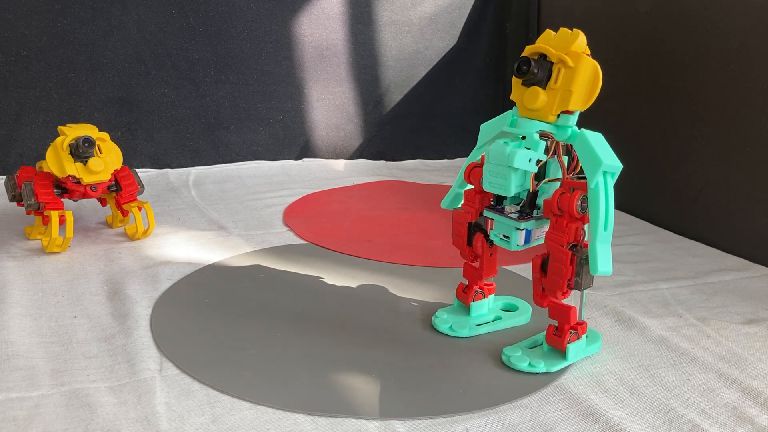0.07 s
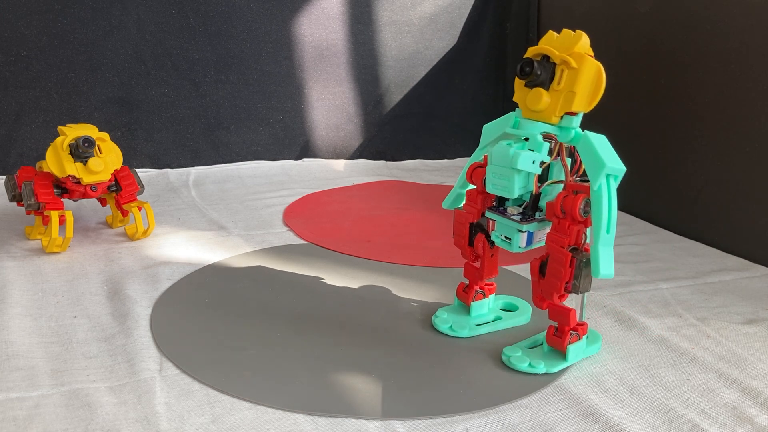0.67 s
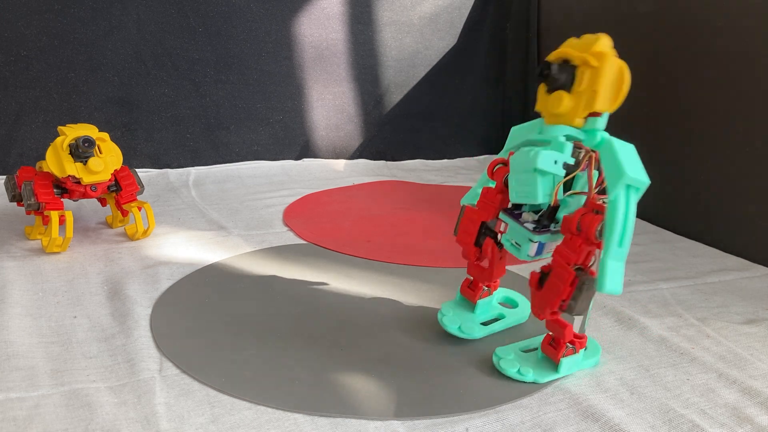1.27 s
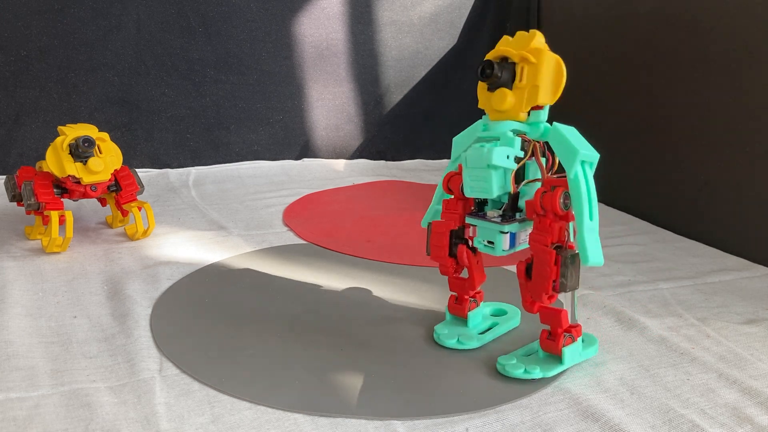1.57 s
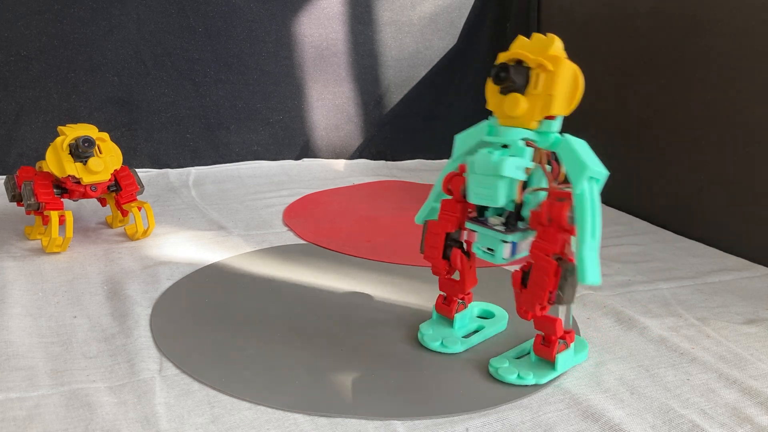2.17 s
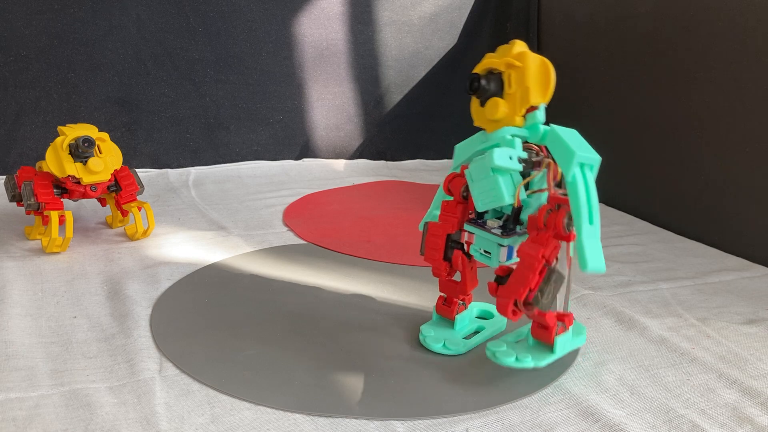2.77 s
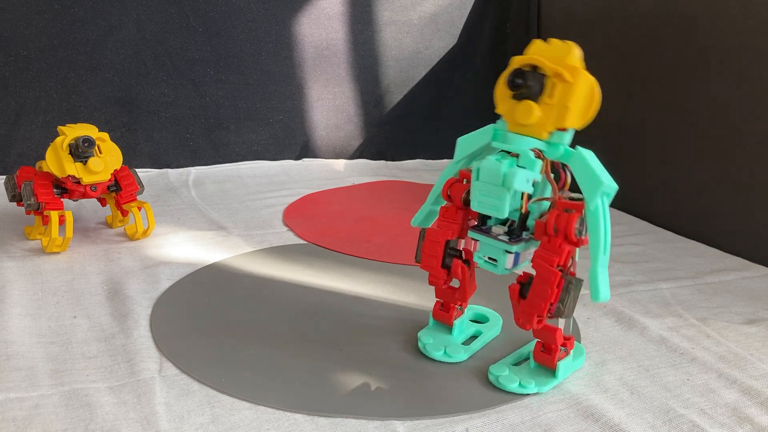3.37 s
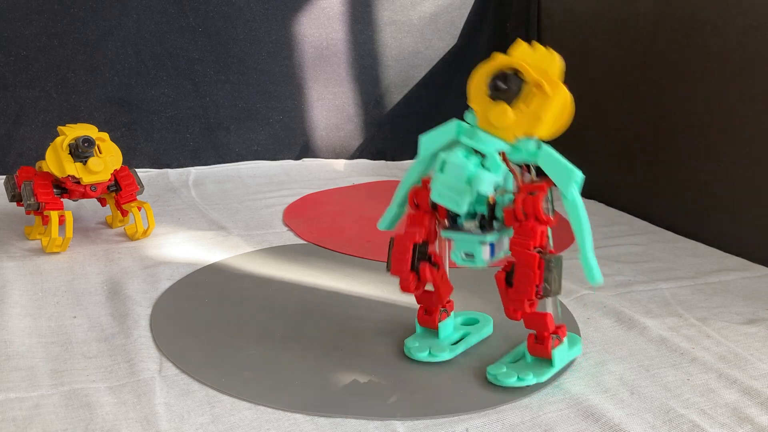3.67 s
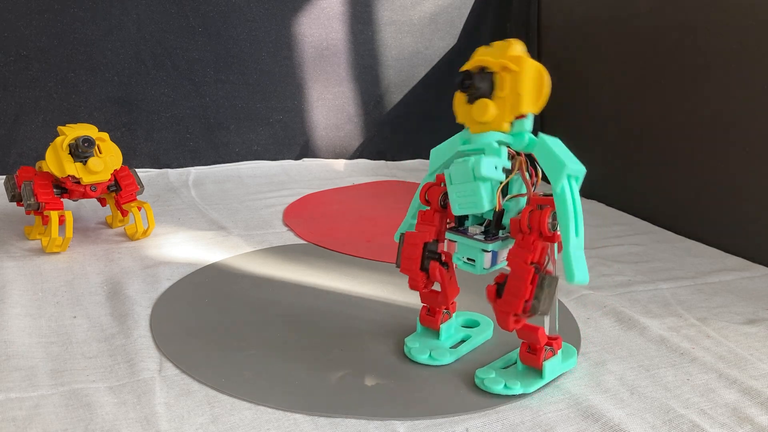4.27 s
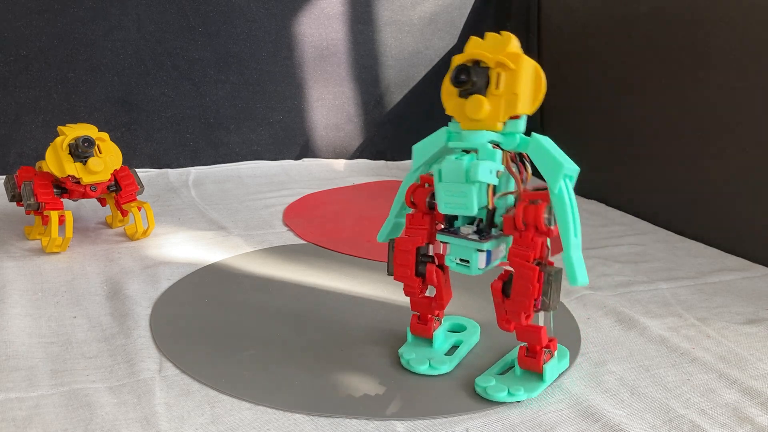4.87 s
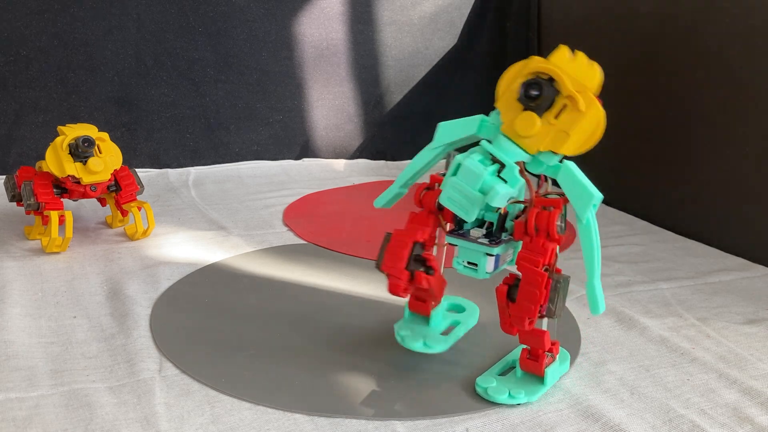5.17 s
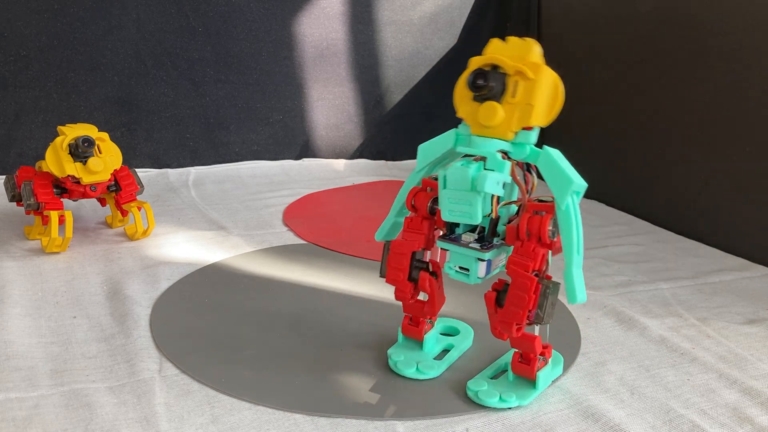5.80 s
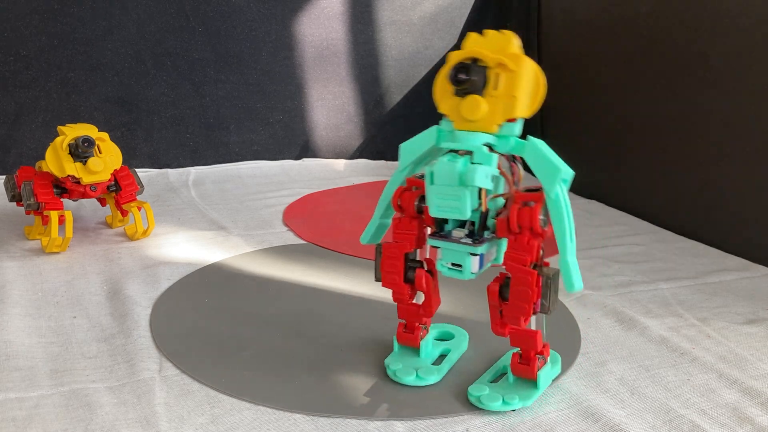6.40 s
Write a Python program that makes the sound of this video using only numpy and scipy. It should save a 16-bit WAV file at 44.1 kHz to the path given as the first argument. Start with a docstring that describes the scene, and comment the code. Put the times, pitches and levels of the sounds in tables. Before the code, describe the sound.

Rhythmic bursts of high servo rattle and gear snaps, with soft thumps and clacks as a little robot steps across a tabletop.

```python
"""A small plastic robot takes seven rattling, thumping steps on a cloth-covered table, heard close in stereo.
Tooth impacts in its servo gear trains rattle in bursts, snap on starts and jolts, squeal at the fastest
moves and buzz in the hip as the weight shifts. The frame groans as a leg lifts; each footfall clacks
the sole and rings the table top. A quiet room rumbles underneath, with a faint whistle before the walk."""
import sys
import numpy as np
from scipy import signal
from scipy.fft import rfft, irfft, next_fast_len
from scipy.io import wavfile
from scipy.ndimage import uniform_filter1d, map_coordinates

SR = 44100
rng = np.random.default_rng(int(sys.argv[2]) if len(sys.argv) > 2 else 0)


def dump_mix(stems):
    """Bounce the given channels to the path in sys.argv[1] as a 16-bit WAV at rate SR."""
    frames = np.atleast_2d(stems).T  # one column per channel
    limited = np.clip(frames, -1, 1)  # hard clip at full scale
    pcm = np.round(limited * 32767).astype(np.int16)
    wavfile.write(sys.argv[1], SR, pcm)


N = 284004

# footfalls, alternating, left first: (time [s], servo effort [dB], table thump [dB], heel knock [dB],
# sole clack [dB], gear snap [dB], squeal [dB], frame groan [dB])
FOOTFALLS = [(1.203, 0.5, -39, -32.5, -44, -21, -29, -47),
             (2.022, -1.5, -43.5, -47, -43.5, -39, -27, -55.5),
             (2.844, 0.5, -36.5, -30, -42.5, -25, -23, -47),
             (3.658, 0.26, -38.5, -41.5, -38.5, -35, -27, -50.5),
             (4.458, 1.5, -39.5, -41.5, -45, -30, -23, -46.5), (5.275, 1, -39, -49, -39.5, -35, -25.5, -55),
             (6.070, 3, -44.5, -44, -47.5, -39, -19.5, -49)]
# table top: (frequency [Hz], level [dB], t60 [s])
TABLE_MODES = [(48.1, -12.5, 1), (91, -5.5, 0.67), (126, 2, 0.3), (174, -10.5, 0.2), (212.3, -7, 0.42),
               (238.2, -6.5, 0.29), (350, -23.5, 0.35), (431, -10, 0.083)]
# gear teeth: (frequency [Hz], level [dB])
TEETH_SPECTRUM = [(500, -62), (1500, -52.5), (3000, -22), (4000, -17), (5000, -11), (6200, -9), (7000, -1),
                  (8000, -1), (9000, 1), (10200, 2.5), (11500, -.5), (12900, -0.5), (13700, -1.5),
                  (15000, -7), (16000, -15)]
# commands that jerk the servos awake: (time from footfall [s], snap [dB])
LEFT_WAKES = [(-.201, -46), (.208, -60), (.369, -53)]
RIGHT_WAKES = [(-.197, -43), (.214, -52), (0.358, -47)]


def amp(db):
    """Decibels to gain."""
    return 10 ** (np.asarray(db) / 20)


def unit(x):
    """Scale to rms 1."""
    return x / np.sqrt(np.mean(x ** 2) + 1e-20)


def along(points, hz):
    """Interpolate (frequency [Hz], value) points on a log axis."""
    knots_hz, values = np.transpose(points)
    return np.interp(np.log(hz + 1), np.log(knots_hz + 1), values)


def curves(rows):
    """A gate over the rows' time span, then each further column per sample."""
    s, *columns = np.transpose(rows)
    t = np.arange(N) / SR
    gate = uniform_filter1d(1.0 * ((t >= s[0]) & (t <= s[-1])), size=128)
    return [gate] + [np.interp(t, s, column) for column in columns]


def wobble(rate_hz):
    """Smooth random curve, rate_hz knots a second."""
    knots = rng.standard_normal(int(N * rate_hz / SR) + 4)
    return map_coordinates(knots, [np.arange(N) * rate_hz / SR])


def filtered(x, response):
    """Apply a frequency response."""
    n = x.shape[-1]
    padded = next_fast_len(n + 4096)
    return irfft(rfft(x, padded) * response(np.fft.rfftfreq(padded, 1 / SR)), padded)[..., :n]


def coloured(x, spectrum):
    """Shape x by a dB spectrum; rms 1."""
    return unit(filtered(x, lambda hz: amp(along(spectrum, hz))))


def burst(spectrum, t60_s):
    """Dense modes struck once, as decaying noise."""
    t = np.arange(SR // 4) / SR
    return coloured(rng.standard_normal(len(t)), spectrum) * amp(-60 * t / t60_s)


def add(track, start_s, sound):
    """Mix a sound into the track."""
    part = track[max(round(start_s * SR), 0):][:len(sound)]
    part += sound[:len(part)]


def gait(left, right):
    """Each leg's pattern at its footfalls: (time [s], effort [dB], squeal [dB], its other columns)."""
    return [(s + offset_s, effort_db, squeal_db, *rest)
            for k, (s, effort_db, *_, squeal_db, _) in enumerate(FOOTFALLS)
            for offset_s, *rest in (right if k % 2 else left)]


def background():
    """Room rumble, nearly alike on both sides, and a faint wavering whistle."""
    # room air: (frequency [Hz], level [dB])
    air_spectrum = [(15, -29), (30, -11), (48, 3), (75, 0), (125, -8), (196, -18.5), (344, -24.5),
                    (900, -25.5), (2700, -43), (4500, -44.5), (9000, -47), (15000, -47)]
    # whistle: (time [s], pitch [Hz], level [dB])
    whistle_path = [(0, 4220, -69), (.2, 3980, -62.5), (.33, 3420, -71), (.39, 3400, -78), (.48, 3870, -64),
                    (.58, 3860, -67)]
    shared = coloured(rng.standard_normal(N), air_spectrum)
    apart = coloured(rng.standard_normal((2, N)), air_spectrum)
    gate, hz, db = curves(whistle_path)
    roughness = wobble(550)
    pitch_hz = hz + 130 * wobble(200) + 130 * wobble(36)
    whistle = unit(roughness * np.sin(2 * np.pi * np.cumsum(pitch_hz) / SR))
    return amp(-62) * (shared + .25 * apart) + gate * amp(db - 14.5 + 3 * wobble(30.2)) * whistle


def sole_rocks():
    """When a sole rocks and slaps back; drives both snaps and feet."""
    # (time [s], sole clack [dB], gear snap [dB])
    rocks = [(.729, -57.5, -53), (2.142, -55, -39), (3.018, -46.5, -31.5), (3.804, -48, -35),
             (4.636, -49, -37), (5.154, -47.5, -35), (5.396, -49, -46), (6.247, -49, -34)]
    return rocks


def gear_snaps():
    """Teeth slap together when a servo starts or a foot jolts it."""
    # gear play taken up at power-on: (time [s], level [dB])
    power_on = [(0.5469, -53), (.5643, -50), (.5712, -43), (.5823, -42)]
    out = np.zeros(N)
    landings = [(s, db) for s, *_, db, _, _ in FOOTFALLS]
    jolts = [(s, db) for s, *_, db in sole_rocks() + gait(LEFT_WAKES, RIGHT_WAKES)]
    for s, db in power_on + landings + jolts:
        add(out, s, amp(db + 4) * burst(TEETH_SPECTRUM, t60_s=.025))
    return out


def servo_moves():
    """Every servo run: (start [s], length [s], teeth [dB], housing [dB])."""
    # lean, take up slack, lift, swing, reach down, take the weight, settle:
    # (start from footfall [s], length [s], teeth [dB], housing [dB])
    left_moves = [(-.44, 0.257, -48.5, -70.5), (-.193, 0.035, -37.5, -60), (-.162, 0.033, -30, -56.5),
                  (-.13, 0.061, -32.5, -61), (-.07, 0.046, -47, -67.5), (-.028, .028, -37, -59.5),
                  (0, 0.093, -29, -52.5), (.091, 0.11, -40, -56)]
    right_moves = [(-.445, 0.11, -45.5, -71.5), (-.345, 0.034, -35.5, -57), (-.283, 0.044, -38, -59),
                   (-.188, 0.017, -43, -57.5), (-.172, 0.046, -24.5, -57), (-.128, 0.055, -35, -57),
                   (-.042, .042, -38.5, -60), (0, .086, -30, -54), (.09, 0.11, -42.5, -56)]
    # balance corrections between steps: (start [s], teeth [dB])
    trims = [(.58, -47.5), (.72, -41), (0.783, -43.5), (0.851, -44.5), (2.445, -39.5), (4.092, -40.5),
             (5.70, -40)]
    trim_s = .037
    walk = [(s, length_s, teeth_db + effort_db, housing_db + effort_db)
            for s, effort_db, _, length_s, teeth_db, housing_db in gait(left_moves, right_moves)]
    return walk + [(s, trim_s, db, db - 21.5) for s, db in trims]


def move_envelope(levels_db, rise_s, fall_s, sag_db):
    """Each move spins up, sags as the joint nears its goal, and stops."""
    out = np.zeros(N)
    for (start_s, length_s, *_), db in zip(servo_moves(), levels_db):
        t = np.arange(-SR // 50, round(length_s * SR) + SR // 25) / SR
        gate = (1 + np.tanh(t / rise_s)) * (1 - np.tanh((t - length_s) / fall_s)) / 4
        progress = np.clip(t / length_s, 0, 1)
        add(out, start_s + t[0], gate * amp(db - sag_db * (progress - .5)))
    return out


def tooth_impacts(tooth_hz, jitter, scatter_db):
    """One impulse per tooth, uneven in size and time (jitter in tooth periods)."""
    at = np.flatnonzero(np.diff(np.floor(np.cumsum(tooth_hz) / SR)))
    late, size = rng.standard_normal((2, N // 4))[:, :len(at)]
    at = np.clip(at + jitter * late * SR / tooth_hz[at], 0, N - 1).astype(int)
    return np.bincount(at, amp(scatter_db * size), N)


def gear_mesh(tooth_hz, jitter, scatter_db, t60_s):
    """Tooth impacts ring briefly in the servo's case."""
    hits = tooth_impacts(tooth_hz, jitter, scatter_db)
    hits -= uniform_filter1d(hits, size=256)
    t = np.arange(SR // 50) / SR
    case_ring = rng.standard_normal(len(t)) * amp(-60 * t / t60_s)
    return unit(signal.fftconvolve(hits, case_ring)[:N])


def shifting_resonances(x, depth_db):
    """Random spectral patches: resonances come and go with joint angle and load."""
    bins = signal.stft(x, nperseg=256)[2]
    patches = uniform_filter1d(rng.standard_normal(bins.shape), size=4, axis=0)
    patches = uniform_filter1d(patches, size=9, axis=1)
    return signal.istft(bins * amp(depth_db * unit(patches)), nperseg=256)[1][:N]


def gear_trains(spectrum, tooth_hz, jitter, flutter_db, count):
    """Gear trains take turns in the lead, hunting in speed and fluttering as their drives correct."""
    rattle = np.zeros(N)
    shares = amp([4 * wobble(13) for _ in range(count)])
    for share in shares / np.linalg.norm(shares, axis=0):
        hunting_hz = tooth_hz * np.exp(.16 * wobble(20) + .025 * wobble(130))
        rattle += share * gear_mesh(hunting_hz, jitter, scatter_db=3.5, t60_s=.008)
    rattle = shifting_resonances(rattle, depth_db=3.2)
    return unit(coloured(rattle, spectrum) * amp(flutter_db * wobble(160)))


def table_response(hz):
    """The table top's modes, low-passed at 300 Hz."""
    modes = sum(amp(db) / (1 + 1j * (hz - mode_hz) * t60_s * np.pi / np.log(1000))
                for mode_hz, db, t60_s in TABLE_MODES)
    return modes / (1 + (hz / 300) ** 4)


def command_dips(depth_db, width_s):
    """Gain of the gear noise: sinks just before each command, returns at once."""
    commands_s = [s for s, *_ in gait(LEFT_WAKES, RIGHT_WAKES)]
    ahead_s = np.subtract.outer(commands_s, np.arange(N) / SR)
    dips = (ahead_s > 0) * np.exp(-(ahead_s / width_s) ** 2)
    return amp(depth_db * dips.sum(axis=0))


def servos():
    """Moves hiss in the teeth, rattle the housing and shake the table; holding servos chatter softly."""
    # housing rattle and holding chatter: (frequency [Hz], level [dB])
    housing_spectrum = [(200, -15), (450, -13), (1000, -9), (1600, -5), (2200, -2), (2650, -5), (3250, 5.5),
                        (3800, 0.5), (5000, 0), (9000, -32)]
    holding_spectrum = [(300, -9), (1200, -22.5), (2400, -19), (3300, -10.5), (3900, -8), (5000, -3),
                        (10000, 6), (13000, -5), (16000, -8)]
    _, _, teeth_db, housing_db = np.transpose(servo_moves())
    speed = move_envelope(teeth_db, rise_s=.005, fall_s=.007, sag_db=2)
    load = move_envelope(housing_db, rise_s=.004, fall_s=.008, sag_db=2)
    teeth = speed * gear_trains(TEETH_SPECTRUM, tooth_hz=2300, jitter=.09, flutter_db=3, count=4)
    housing = load * gear_trains(housing_spectrum, tooth_hz=801.6, jitter=.3, flutter_db=1.5, count=3)
    powered = np.clip((np.arange(N) / SR - .57) / .02, 0, 1)
    hold = powered * amp(-49.5 + 1.7 * wobble(22))
    chatter = hold * gear_trains(holding_spectrum, tooth_hz=894, jitter=.35, flutter_db=2.5, count=3)
    gears = amp(-1.5) * teeth + amp(1.5) * housing + chatter
    shake = unit(filtered(rng.standard_normal(N) * load, table_response))
    load_rms = np.sqrt(np.mean(load ** 2))
    return command_dips(depth_db=-9, width_s=.022) * gears + amp(-4.5) * load_rms * shake


def frame_groans():
    """The loaded leg shudders in the plastic frame's low resonances as the other lifts."""
    # frame: (frequency [Hz], level [dB])
    frame_spectrum = [(120, -4), (195, -14), (235, 11), (275, -7), (320, -19), (700, -22.5)]
    lead_s = .166
    out = np.zeros(N)
    for s, *_, db in FOOTFALLS:
        add(out, s - lead_s, amp(db) * burst(frame_spectrum, t60_s=.36))
    return out


def feet():
    """The sole clacks, the heel knocks dully through the cloth, the table top rings on."""
    # heel and plastic sole: (frequency [Hz], level [dB])
    heel_spectrum = [(60, -38), (150, 3.5), (250, 1), (440, 4), (550, -7), (700, -17.5), (950, -19),
                     (2500, -69)]
    sole_spectrum = [(150, -20), (500, -1.5), (1200, 2), (2200, 3), (3200, 8), (4500, -18), (9000, -13)]
    out = np.zeros(N)
    t = np.arange(SR // 2) / SR
    landings = [(s, thump, heel, clack) for s, _, thump, heel, clack, *_ in FOOTFALLS]
    slaps = [(s, clack - 15, clack - 25, clack) for s, clack, _ in sole_rocks()]
    for s, thump_db, heel_db, clack_db in landings + slaps:
        ring = np.zeros(len(t))
        for hz, db, t60_s in TABLE_MODES:
            decay = amp(db + rng.normal(0, 1) - 60 * t / t60_s)
            ring += decay * np.sin(2 * np.pi * (hz * t + rng.random()))
        add(out, s, amp(thump_db) * ring * (1 - np.exp(-t / .0072)))
        add(out, s, amp(heel_db - 4) * burst(heel_spectrum, t60_s=.1))
        add(out, s, amp(clack_db + 1) * burst(sole_spectrum, t60_s=.058))
    return out


def gear_squeals():
    """A racing mesh sings rough gliding overtones over its own rasp."""
    # gears race as the left leg takes the weight and as the right leg lifts:
    # (time from footfall [s], level re step's squeal [dB], half length [s], mesh [Hz], glide [oct/s])
    left_squeals = [(.019, -4.5, 0.0047, 2385, -20.5), (.0325, 3, 0.0027, 2141, -18)]
    right_squeals = [(-.165, -1.5, 0.0084, 2600, 10.5), (-.137, -6.5, 0.0035, 2762, -7)]
    harmonics_db = [-42, -24, 5.5, -3, 7]
    out = np.zeros(N)
    t = np.arange(-SR // 25, SR // 25) / SR
    for s, _, squeal_db, db, half_s, mesh_hz, glide in gait(left_squeals, right_squeals):
        drift_rad = np.cumsum(rng.standard_normal(len(t))) * .0395
        phase = 2 * np.pi * np.cumsum(mesh_hz * 2 ** (glide * t)) / SR + drift_rad
        tone = sum(amp(level) * np.sin(k * phase) for k, level in enumerate(harmonics_db, 1))
        rasp = coloured(rng.standard_normal(len(t)), TEETH_SPECTRUM)
        envelope = amp(squeal_db + db - 2) * np.exp(-.5 * (t / half_s) ** 2)
        add(out, s + t[0], envelope * unit(unit(tone) + 1.5 * rasp))
    return out


def hip_buzz():
    """One slow servo buzzes as the weight shifts after each left footfall; each tooth scrapes past."""
    # hip servo: (frequency [Hz], level [dB])
    hip_spectrum = [(600, -31.5), (2400, -31.5), (3300, -16.5), (3800, -13), (4700, -0.5), (5800, -14.5),
                    (8000, 2), (11000, -4.5), (12800, -1), (13800, 7.5), (15200, -9.5)]
    # its double push: (time from start [s], tooth rate [Hz], level [dB])
    double_push = [(0, 579.5, -57), (.028, 615.2, -39), (.055, 646, -56.5), (.09, 681.6, -37),
                   (.12, 670, -50.5), (.15, 666.6, -41), (.175, 660, -67)]
    delay_s = .189
    out = np.zeros(N)
    for s, effort_db, *_ in FOOTFALLS[::2]:
        gate, tooth_hz, db = curves(np.add(double_push, [s + delay_s, 0, effort_db]))
        buzz = tooth_impacts(tooth_hz * np.exp(.046 * wobble(60)), jitter=.055, scatter_db=0)
        scrape = signal.lfilter([1], [1, -.93], buzz) * rng.standard_normal(N)
        out += gate * amp(db + 1.5) * coloured(.5 * unit(buzz) + unit(scrape), hip_spectrum)
    return out


def room_tail(x):
    """Soft diffuse reverberation, different at each microphone."""
    # room decay: (frequency [Hz], t60 [s])
    decay_times = [(100, 0.063), (600, 0.33), (4000, 0.14), (14000, 0.06)]
    # tail colour: (frequency [Hz], level [dB])
    tail_spectrum = [(100, -22), (300, -1.5), (700, 3), (2000, -4.5), (4200, -6.5), (5400, -3), (7000, -7),
                     (14000, -34)]
    hz, t, bins = signal.stft(rng.standard_normal((2, SR // 2)), SR, nperseg=256)
    decay = amp(-60 * t / along(decay_times, hz)[:, None])
    decay /= np.linalg.norm(decay, axis=1, keepdims=True) * np.sqrt(128)
    tail = signal.istft(bins * decay * amp(along(tail_spectrum, hz))[:, None], SR, nperseg=256)[1]
    delayed = np.pad(x, (SR // 300, 0))
    return signal.fftconvolve(delayed[None], tail, axes=1)[:, :N]


def scene():
    """Robot and room; treble reaches the two microphone ports out of step."""
    # port mismatch: (frequency [Hz], left minus right phase [rad])
    port_phase = [(20, 0), (5000, 0), (5800, .6), (7000, 0), (9150, -3.14), (11350, -6.28), (13600, -9.42),
                  (15600, -12.5)]
    robot = servos() + hip_buzz() + gear_squeals() + gear_snaps() + frame_groans() + feet()
    ports = lambda hz: np.exp(.5j * np.outer([1, -1], np.interp(hz, *np.transpose(port_phase))))
    return filtered(robot + background(), ports) + room_tail(robot)


def record(dry):
    """Band-limited microphone pair; the left is weaker in the bass, stronger in the mids."""
    # (frequency [Hz], left minus right [dB])
    balance = [(50, -3), (200, -1), (1000, 2), (4000, -.1)]
    top_hz = 15900
    return filtered(dry, lambda hz: amp(np.outer([.5, -.5], along(balance, hz))) * (hz < top_hz))


dry = scene()
out = record(dry)
dump_mix(out)
```